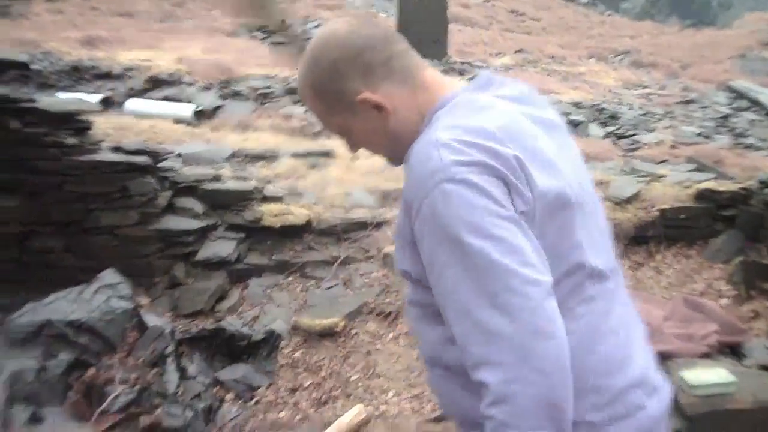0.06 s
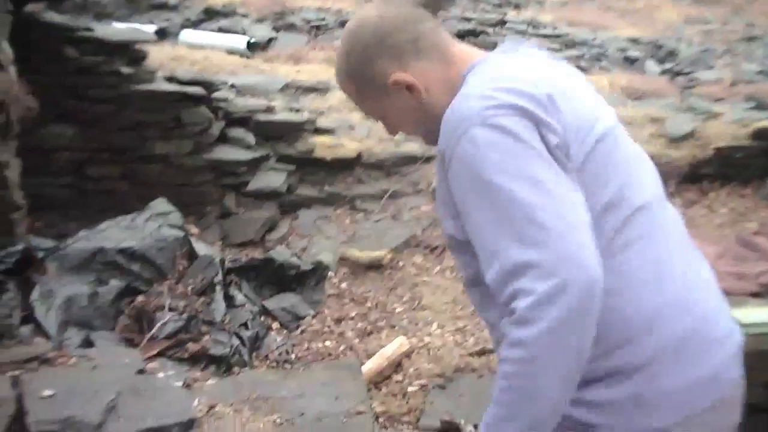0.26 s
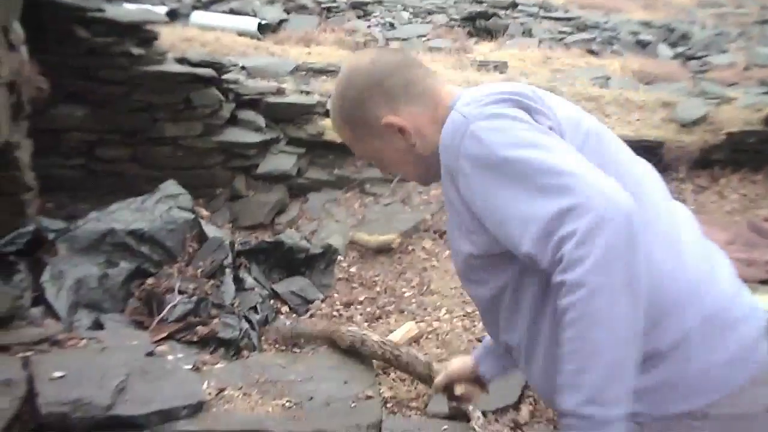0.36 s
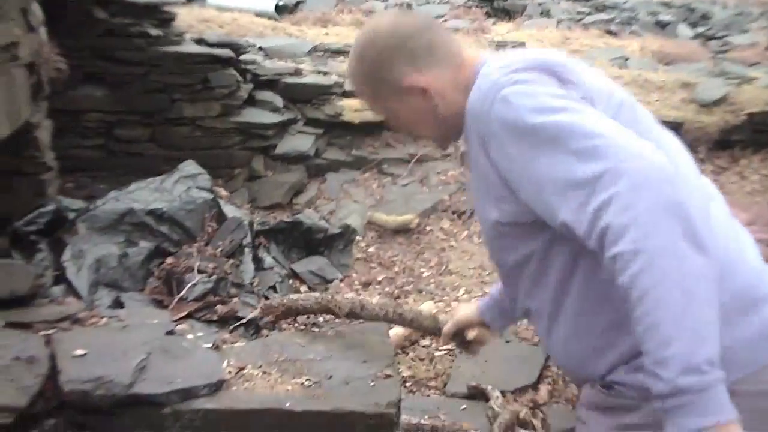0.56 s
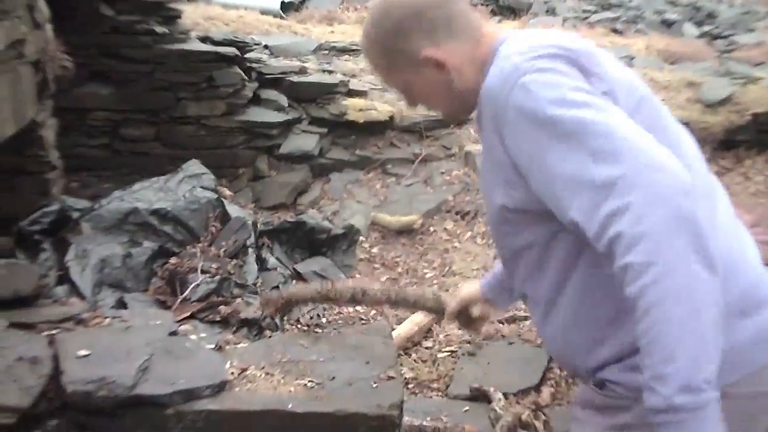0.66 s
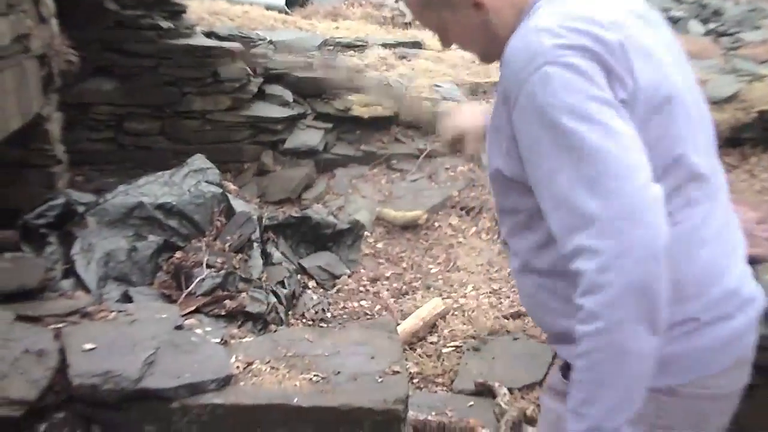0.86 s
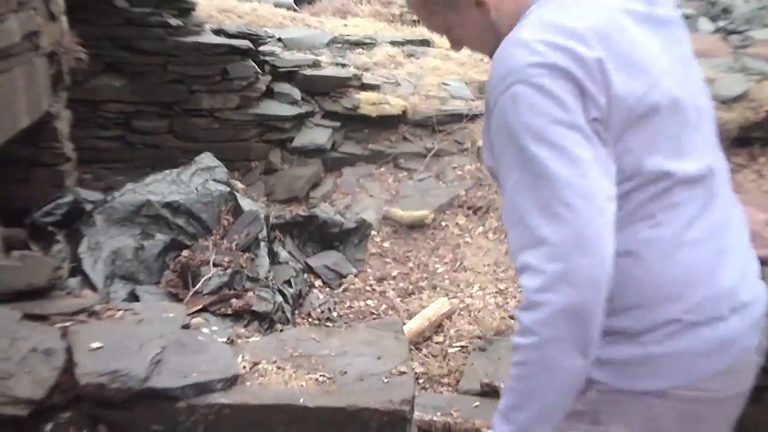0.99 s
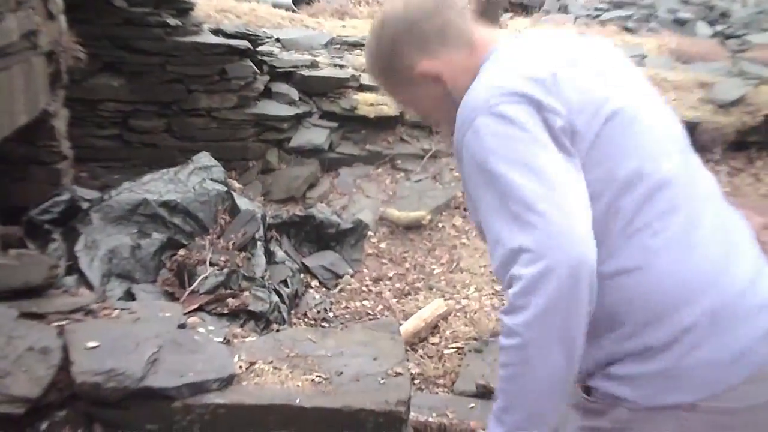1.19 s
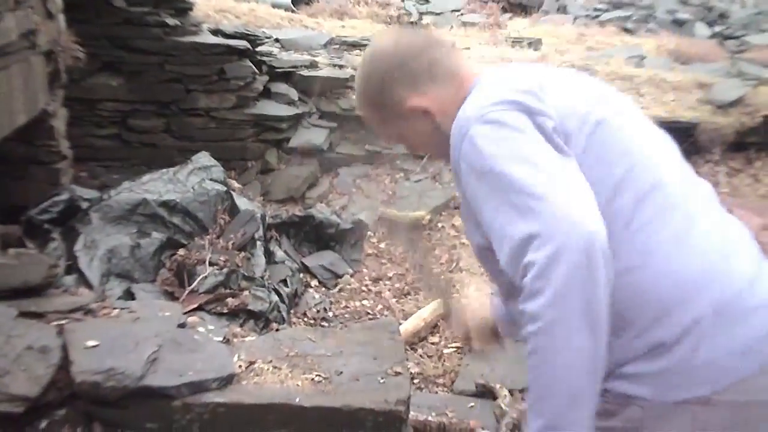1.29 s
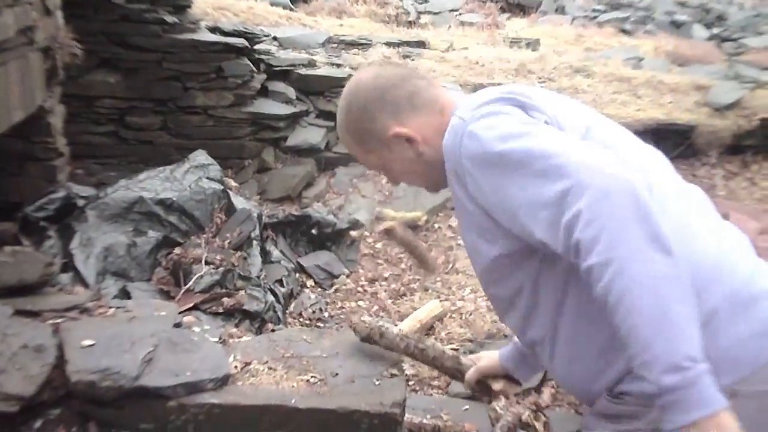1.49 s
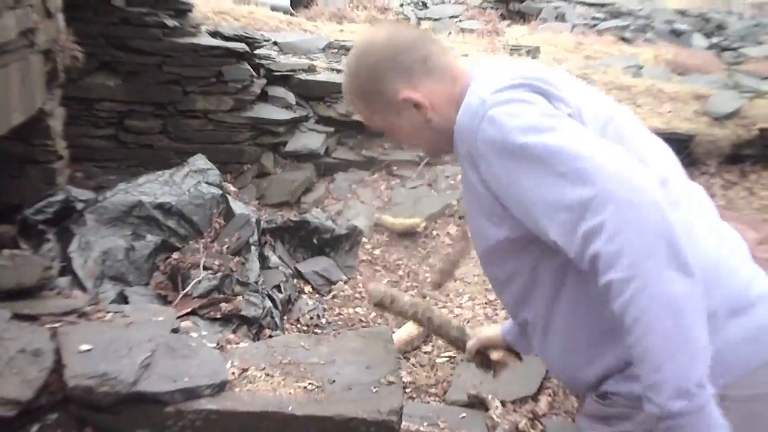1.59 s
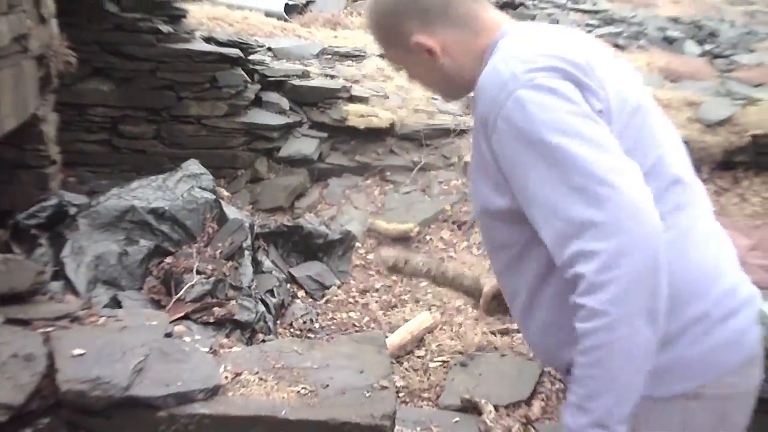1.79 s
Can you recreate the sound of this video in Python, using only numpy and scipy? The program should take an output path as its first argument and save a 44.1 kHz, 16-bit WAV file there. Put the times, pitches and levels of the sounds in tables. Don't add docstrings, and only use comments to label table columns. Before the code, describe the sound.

Two close, hard wood-on-stone cracks about a second apart, the second softer, each with snapping fibres and a brief rattling tail; small chips tick, dry leaves rustle, low wind buffets the microphone over a quiet hillside hush.

```python
import sys
import numpy as np
from scipy import signal
from scipy.io import wavfile

SR = 44100
rng = np.random.default_rng(int(sys.argv[2]) if len(sys.argv) > 2 else 0)


def inscribe(sig):
    pcm = np.round(np.clip(np.atleast_2d(sig).T, -1, 1) * 32767)
    wavfile.write(sys.argv[1], SR, pcm.astype(np.int16))


def decibels_to_gain(level_db):
    exponent = np.asarray(level_db, float) / 20
    return 10 ** exponent


N = 81585


def rms_one(x):
    return x / np.sqrt(np.mean(x ** 2) + 1e-20)


def in_time(rows):
    s, *columns = np.transpose(rows)
    return [np.interp(np.arange(N) / SR, s, column) for column in columns]


def at_hz(points, hz):
    f, value = np.array(points).T
    return np.interp(np.log(hz), np.log(f), value)


def drift(rate_hz):
    r = np.exp(-2 * np.pi * rate_hz * 40 / SR)
    slow = signal.lfilter([1], [1, -2 * r, r * r], rng.standard_normal(N // 40 + 2002))[2000:]
    return np.interp(np.arange(N) / 40, np.arange(len(slow)), rms_one(slow - slow.mean()))


def click(s, size):
    return size * (np.arange(N) == int(s * SR)) + 1e-18


def dying(s, t60):
    t = np.arange(N) / SR - s
    return (t >= 0) * decibels_to_gain(-60 * np.maximum(t, 0) / t60)


def ring(clicks, hz, t60):
    r, w = decibels_to_gain(-60 / (t60 * SR)), 2 * np.pi * hz / SR
    return signal.lfilter([0, np.sin(w)], [1, -2 * r * np.cos(w), r * r], clicks)


def band(x, low_hz, high_hz):
    sos = signal.butter(2, [low_hz, min(high_hz, .45 * SR)], "band", fs=SR, output="sos")
    return signal.sosfilt(sos, x)


def noise():
    return rng.standard_normal((2, 2, N))


# f/Hz, likeness (0 to 1)
LIKENESS = [(60, 1), (180, 0.43), (540, 1), (1610, 1), (4830, 0.97), (14500, 0.6)]


def coloured(white, spectrum, patchy_db, apart):
    out = 0
    edges = 17 * 2 ** np.arange(0, 10.1, .5)
    for k, (low, high) in enumerate(zip(edges, edges[1:])):
        hz = np.sqrt(low * high)
        if spectrum[0][0] < high and low < spectrum[-1][0]:
            mid, side = band(white[k % 2], low, high)
            alike = np.clip(1 - apart * (1 - at_hz(LIKENESS, hz)), 0, 1)
            gain = decibels_to_gain(at_hz(spectrum, hz) + patchy_db * drift(10))
            out = out + gain * (np.sqrt(1 + alike) * mid + np.sqrt(1 - alike) * side * [[1], [-1]])
    return rms_one(out)


def puffs(rows, spread):
    white, out = rng.standard_normal(N), 0
    for s, db, hz, t60 in rows:
        puff = dying(s, t60) * rms_one(band(white, hz / spread, hz * spread))
        out = out + decibels_to_gain(db) * band(puff, hz / 1.5, hz * 1.5)
    return out


# t/s, level/dB, crack level/dB, ground thud level/dB
BLOWS = [
    (0.2224, 8.5, -16, -20),
    (1.1659, 5, -15.5, -20.5),
]
# f/Hz, first-blow level/dB, second-blow level/dB, t60/s
BRANCH = [(315, -11, -9.5, 0.021), (362.5, -21, -21, 0.059), (460, -22, -19.5, 0.082),
          (723.4, -2.5, 2, 0.018), (831.4, 5, 5.5, 0.021), (917, -2.5, -20.5, 0.021), (1054, 1, 2.5, 0.025),
          (1221.3, -4.5, -8, 0.062), (1460, -31, -17, 0.023), (1993, -11, -8, 0.014), (2510, -5, 0.5, .015),
          (3036, -7.5, -4.5, 0.0078), (4204, -6.5, -23.5, .015), (5110, -20.5, -11, 0.016)]


def branch():
    contact_hz, most_cycles, bite_s = 2500, 85, .0004
    graze_s, graze_db = .003, -27
    soft, out, t = np.exp(-2 * np.pi * contact_hz / SR), 0, np.arange(N) / SR
    for k, (s, db, _, _) in enumerate(BLOWS):
        hit = signal.lfilter([(1 - soft) ** 2], [1, -2 * soft, soft ** 2], click(s, -decibels_to_gain(db)))
        wood = 0
        for mode in BRANCH:
            hz, t60 = mode[0], min(mode[3], most_cycles / mode[0])
            wood = wood + decibels_to_gain(mode[1 + k]) * ring(hit, hz, t60)
        onset = 1 - dying(s, bite_s * np.log(1000))
        swell = (t < s) * np.clip(1 + (t - s) / graze_s, 0, 1)
        bark = rms_one(band(rng.standard_normal(N), 390, 4900))
        out = out + wood * onset + decibels_to_gain(graze_db) * swell * bark
    return band(out, 125, 16000)


# t/s, f/Hz, level/dB, t60/s
SNAPS = [(.2235, 1927, -4, 0.02), (.2235, 2435, -12.5, 0.0086), (.2255, 3240, -6, 0.0098),
         (.2245, 4227, -15.5, .02), (.2255, 5040, -18, .014), (.2255, 6210, -17, 0.0161),
         (.2255, 7010, -23.5, 0.013), (.2255, 8230, -28, 0.015), (.2255, 8850, -24.5, .014),
         (1.1672, 2517, -9, .012), (1.169, 3030, -4.5, 0.0074), (1.168, 2034, -14, 0.0079),
         (1.168, 1768, -8, 0.025), (1.168, 4005, -13.5, 0.013), (1.168, 4557, -16, .016),
         (1.168, 5080, -18, 0.012), (1.168, 7530, -26, .016)]


def snaps():
    return sum(ring(click(s, decibels_to_gain(db)), hz, t60) for s, hz, db, t60 in SNAPS)


def crack():
    burst = rms_one(band(rng.standard_normal(N), 1783, 7000))
    return sum(decibels_to_gain(db) * dying(s, .023) for s, _, db, _ in BLOWS) * burst


# delay t/s, level/dB
SLAPS = [
    (.009, -21.5),
    (.0155, -22),
    (0.0262, -14.5),
    (.0225, -20),
    (.035, -19),
    (0.047, -27.5),
]


def walls(x):
    scatter_db, scatter_t60_s, scatter_rise_s = -15, 0.19, 0.011
    hill_db, hill_t60_s = -41, 0.91
    t = np.arange(SR) / SR
    grains, slaps = rng.standard_normal(SR) / np.sqrt(SR / 100), np.zeros(SR)
    for lag, db in SLAPS:
        slaps[int(lag * SR)] = decibels_to_gain(db)
    build_up = 1 - np.exp(-(t / scatter_rise_s) ** 2)
    scatter = grains * decibels_to_gain(scatter_db - 60 * t / scatter_t60_s) * build_up
    hill = grains * decibels_to_gain(hill_db - 60 * t / hill_t60_s)
    answer = band(slaps, 850, 1350) + decibels_to_gain(-1.5) * band(slaps, 330, 520)
    answer = answer + band(scatter, 220, 15000) + band(hill, 640, 2996)
    return signal.fftconvolve(x, answer)[:N]


# f/Hz, level/dB per Hz
GRIT_COLOUR = [(59, -33), (100, -37.5), (291, -23), (366, -3), (606, -6), (1230, -3.5), (1430, 2),
               (9030, -30), (14900, -56.5)]
SHED_DB = [1, -0.5]
AIR_DB = [0, -4]


def splinters():
    t60_s, level_db, slap_db = 0.23, -21, -11
    air_t60_s, air_level_db = 0.2, -45
    fall, hiss = 0, 0
    for (s, *_), shed_db, air_db in zip(BLOWS, SHED_DB, AIR_DB):
        renewed = decibels_to_gain(slap_db) * dying(s + SLAPS[2][0], t60_s / 2)
        fall = fall + decibels_to_gain(shed_db) * (dying(s, t60_s) + renewed)
        hiss = hiss + decibels_to_gain(air_level_db + air_db) * dying(s, air_t60_s)
    grit = noise() * (1 + 1.2 * (rng.random(N) < 3000 / SR))
    air = hiss * rms_one(band(grit[0, 0], 8800, 12000))
    return fall * decibels_to_gain(level_db) * coloured(grit, GRIT_COLOUR, patchy_db=1.0, apart=.03) + air


# t/s, level/dB, f/Hz, t60/s
RATTLE = [(.2365, -25.5, 2700, 0.013), (.249, -26.5, 4300, .02), (.253, -28, 3000, .012),
          (.2565, -33, 5200, .012), (.268, -32, 3000, 0.018), (.277, -46, 2900, 0.0074),
          (.291, -41, 2600, .015), (.305, -48, 2500, 0.0072), (.33, -48, 2500, 0.021),
          (.345, -52, 4500, 0.022), (1.181, -28, 1250, .02), (1.186, -37, 5200, .02),
          (1.193, -14, 1250, 0.0085), (1.199, -30, 2600, .015), (1.207, -38, 4600, 0.013),
          (1.212, -36, 1300, .025), (1.222, -36, 1500, .015), (1.241, -21, 1000, 0.024),
          (1.2585, -30, 2500, 0.0099), (1.283, -35, 2300, .012), (1.3085, -47, 5330, .012),
          (1.4522, -55.5, 4860, 0.028), (.2495, -37, 9016, .025), (.262, -27.5, 405, 0.067),
          (1.2, -23, 411, 0.059), (1.62, -53.5, 2560, 0.022), (1.635, -42, 2300, 0.027),
          (1.647, -46, 3020, .02), (1.669, -55, 2700, 0.034), (1.19, -42, 9000, .04)]


def rattle():
    return puffs(RATTLE, spread=1.13)


# t/s, level/dB, f/Hz, t60/s, note over puff level/dB
CHIPS = [(0.394, -59, 9240, 0.03, -14), (0.424, -61, 9270, 0.047, -2.5), (0.4981, -57.5, 9650, 0.045, -5),
         (0.503, -72, 5350, 0.047, 8.5), (0.515, -62, 500, .012, 10), (0.8266, -50, 9420, 0.0085, 0),
         (1.256, -42, 8600, 0.021, -21), (1.258, -43, 2051, .15, 12), (1.2585, -44, 2120, .02, 13),
         (1.2564, -45.5, 2750, 0.028, 5), (1.256, -39, 297.5, 0.11, 1.5), (1.296, -51, 8860, 0.085, -11),
         (1.452, -54.5, 2660, 0.03, 2), (1.5552, -58, 5560, 0.019, 0), (1.582, -45.5, 2230, .015, -1.5),
         (1.5942, -55, 5410, 0.027, -6.5), (1.6166, -56, 5380, 0.042, 5), (1.617, -60, 2650, 0.03, -6),
         (1.619, -44, 830, 0.027, 5.5), (1.6379, -41.5, 1025, 0.052, 8), (1.6375, -46, 777, 0.022, 12),
         (1.637, -50, 2210, 0.037, 6.5), (1.6375, -39.5, 315, 0.074, 8.5), (1.709, -64, 4450, .02, -0.5)]


def chips():
    white, out = rng.standard_normal(N), 0
    for s, db, hz, t60, note_db in CHIPS:
        note = ring(click(s, decibels_to_gain(db + note_db)), hz, t60)
        puff = decibels_to_gain(db) * dying(s, .8 * t60) * rms_one(band(white, hz / 1.4, hz * 1.4))
        out = out + note + puff
    return out


# t/s, level/dB
LEAVES = [
    (1.57, -66),
    (1.605, -62),
    (1.62, -50.5),
    (1.64, -47.5),
    (1.67, -54.5),
    (1.70, -60),
    (1.78, -66.5),
    (1.81, -58),
    (1.85, -83),
]
# f/Hz, level/dB per Hz
LEAF = [(880, -38.5), (1500, -15), (2200, 1), (3670, -14), (4440, -12), (9870, -16), (14900, -28)]


def leaves():
    grains_per_s, rise_s = 1300, 0.027
    strength = decibels_to_gain(1.7 * rng.exponential(1, N))
    grains = noise() * (0.3 + (rng.random(N) < grains_per_s / SR) * strength)
    start = np.clip((np.arange(N) / SR - LEAVES[0][0]) / rise_s, 0, 1)
    return start * decibels_to_gain(in_time(LEAVES)[0]) * coloured(grains, LEAF, patchy_db=1.0, apart=.1)


# f/Hz, width/Hz, gain added
HOUSING = [(3700, 700, -.35), (5500, 700, .4), (6400, 900, -.62), (9300, 3000, .3)]


def housing(x):
    return x + sum(gain * band(x, hz - width / 2, hz + width / 2) for hz, width, gain in HOUSING)


def ground():
    lag_s = .040
    hits = sum(click(s + lag_s, decibels_to_gain(db)) for s, _, _, db in BLOWS)
    thud = ring(hits, 42, .08)
    sway = decibels_to_gain(-11) * ring(hits, 33.1, 0.63)
    return band(thud + sway, 3, 250)


# t/s, level/dB, f/Hz, t60/s
BUMPS = [
    (.005, -39, 34.2, 0.32),
    (.25, -30, 149, 0.1),
    (.29, -39, 84, 0.16),
    (1.27, -40, 140, 0.059),
    (.51, -51.5, 240, 0.16),
    (.585, -53.5, 290, 0.14),
    (1.46, -47.5, 131, 0.15),
    (1.69, -41, 250, 0.12),
]


def bumps():
    return puffs(BUMPS, spread=1.31)


# t/s, level/dB
GUST = [
    (0, -60.5),
    (1.38, -52.5),
    (1.46, -56),
    (1.53, -36.5),
    (1.6, -38),
    (1.66, -37.5),
    (1.75, -41),
    (1.85, -40.5),
]
# f/Hz, level/dB per Hz
WIND = [(12, -29), (20, 2), (135, -9), (252, -18.5), (325, -21.5), (513, -25.5), (600, -33), (780, -63),
        (1320, -120)]


def wind():
    return decibels_to_gain(in_time(GUST)[0] + 2 * drift(14)) * coloured(noise(), WIND, patchy_db=1.5, apart=.2)


# f/Hz, level/dB per Hz
RUMBLE = [(12, -25), (20, 1.5), (59, -9.5), (140, -31.5), (176, -26.5), (200, -19), (260, -51.5),
          (440, -120)]


def rumble():
    return decibels_to_gain(-50.5) * coloured(noise(), RUMBLE, patchy_db=1.0, apart=.5)


# t/s, f/Hz, level/dB
MOTOR = [
    (0, 403, -73.5),
    (.6, 420, -75),
    (.9, 442, -68),
    (1.1, 460, -67.5),
    (1.4, 457.5, -75),
    (1.7, 454.8, -66),
    (1.85, 464, -64.5),
]
MOTOR_ORDERS_DB = [5.5, 3.5, -13, 6.5, -2.5, -3]


def motor():
    blur_hz, out = 41, 0
    hz, db = in_time(MOTOR)
    turns = 2 * np.pi * np.cumsum(hz) / SR
    for order, order_db in enumerate(MOTOR_ORDERS_DB, 1):
        blurred = drift(blur_hz) * np.sin(order * turns) + drift(blur_hz) * np.cos(order * turns)
        out = out + decibels_to_gain(order_db) * blurred
    return decibels_to_gain(db) * out


# f/Hz, level/dB per Hz
HUSH = [(88, -60), (150, -25), (289, -10.5), (476, -6), (588, -6.5), (1220, -3), (1760, -8.5), (2020, -13),
        (14900, -29)]
# t/s, level/dB
HUSH_SWELL = [(0, -1), (.2, -4), (.6, 0), (1.1, -1.5), (1.45, -1.5), (1.85, 1)]


def hush():
    return decibels_to_gain(-54.5 + in_time(HUSH_SWELL)[0]) * coloured(noise(), HUSH, patchy_db=.4, apart=.55)


def scene():
    blows, bits = branch() + snaps(), chips()
    reflected = walls(blows + decibels_to_gain(-9) * bits)
    shed = decibels_to_gain(2 * drift(120)) * splinters()
    near = blows + bits + reflected + crack() + shed + leaves() + rattle()
    return housing(near) + ground() + motor() + bumps() + wind() + rumble() + hush()


def roll_off(x):
    return signal.sosfilt(signal.butter(12, 15070, fs=SR, output="sos"), x)


OFFSETS = [
    [.030],
    [-.0318],
]


def record(dry):
    overload = .995
    clipped = np.clip(dry + OFFSETS, -overload, overload)
    mix = signal.sosfilt(signal.cheby2(8, 50, 18000, fs=SR, output="sos"), clipped)
    return roll_off(mix)


dry = scene()
out = record(dry)
inscribe(out)
```